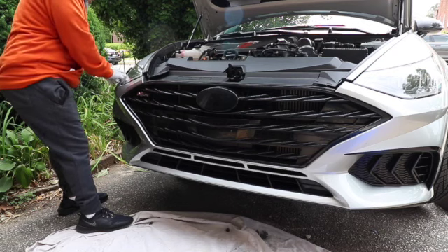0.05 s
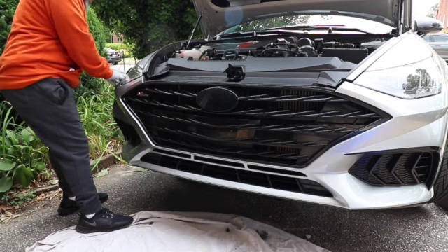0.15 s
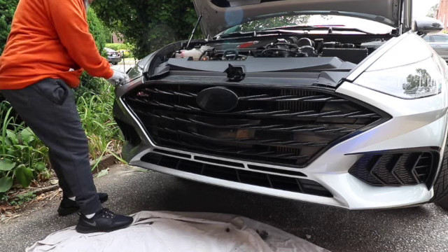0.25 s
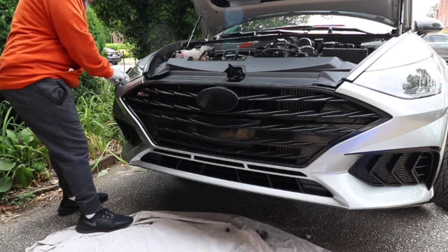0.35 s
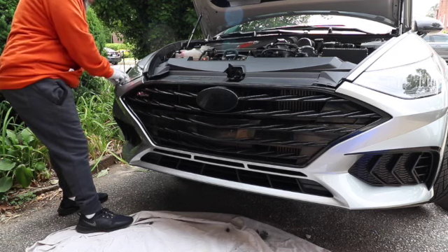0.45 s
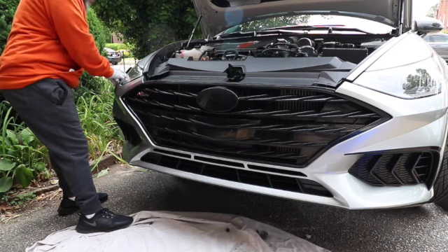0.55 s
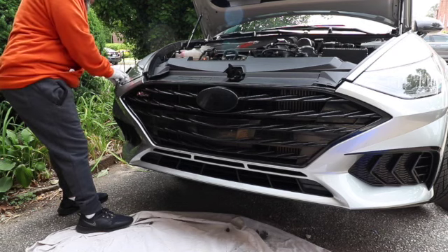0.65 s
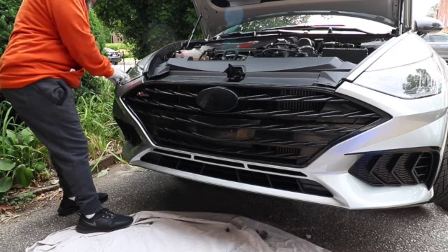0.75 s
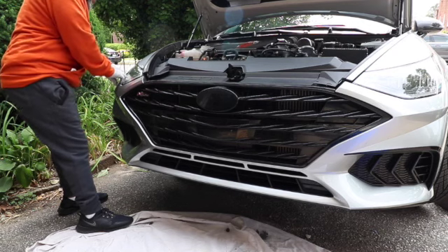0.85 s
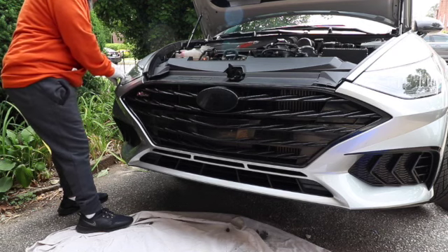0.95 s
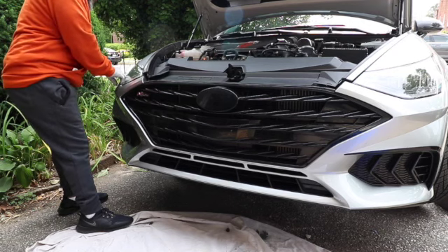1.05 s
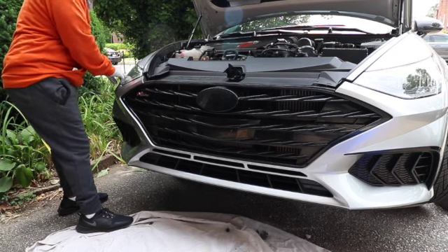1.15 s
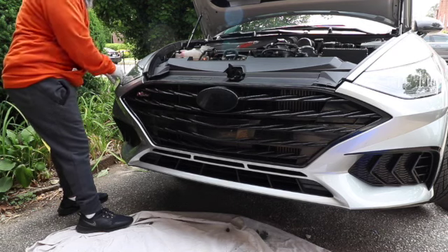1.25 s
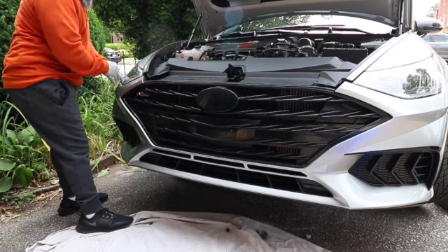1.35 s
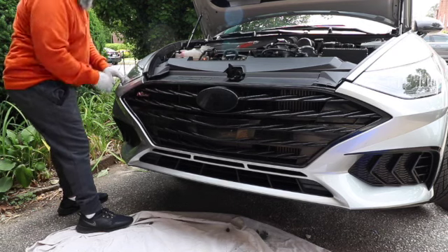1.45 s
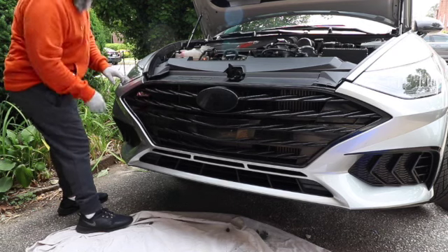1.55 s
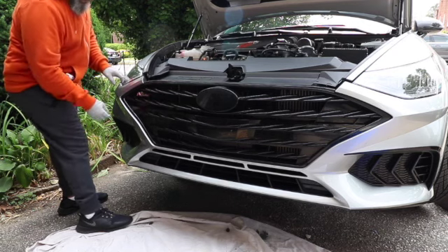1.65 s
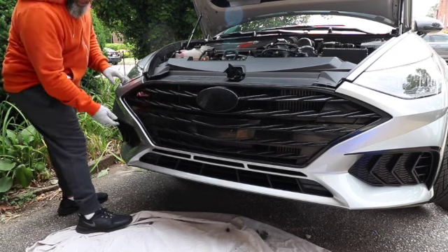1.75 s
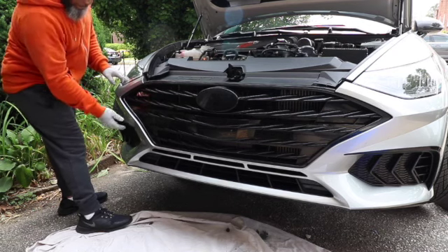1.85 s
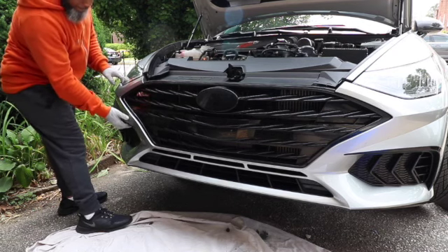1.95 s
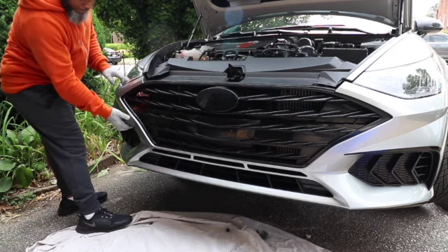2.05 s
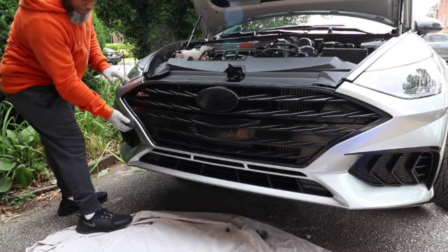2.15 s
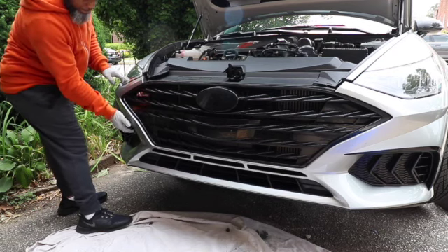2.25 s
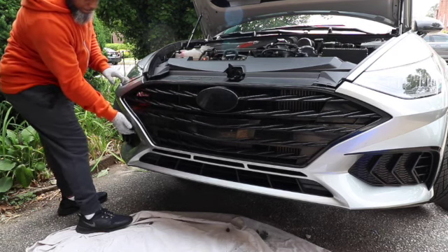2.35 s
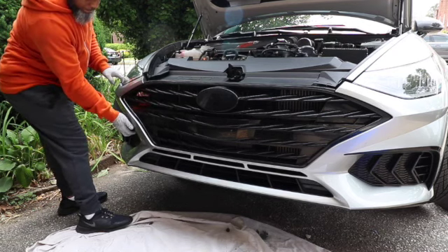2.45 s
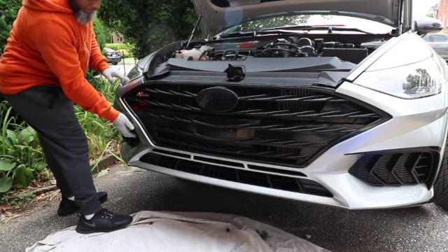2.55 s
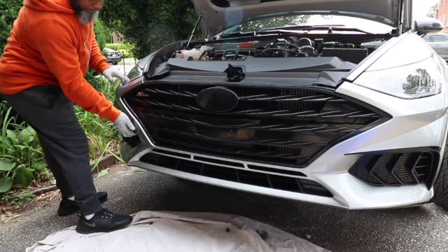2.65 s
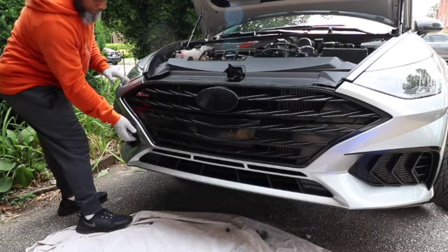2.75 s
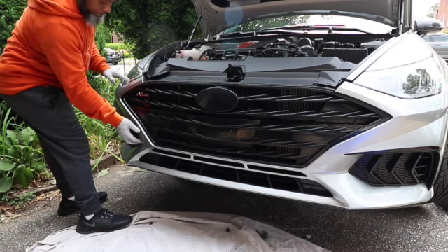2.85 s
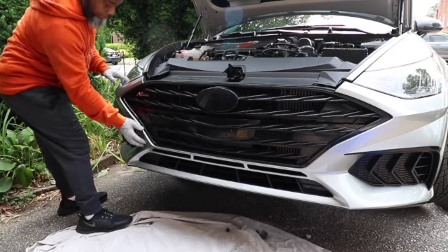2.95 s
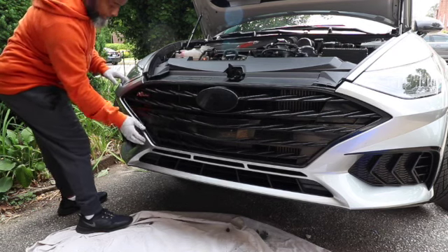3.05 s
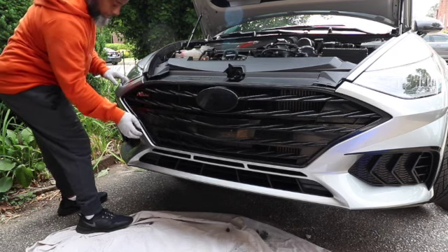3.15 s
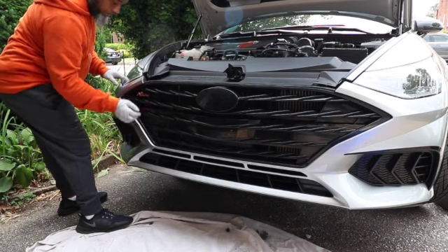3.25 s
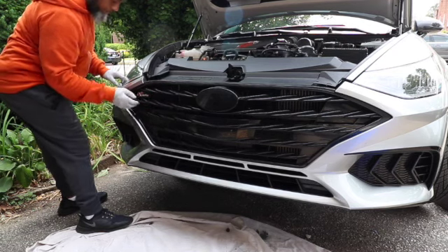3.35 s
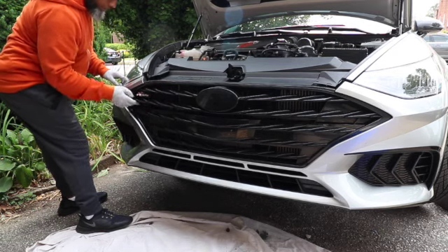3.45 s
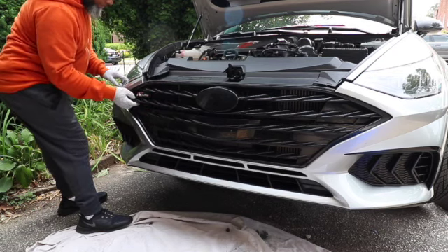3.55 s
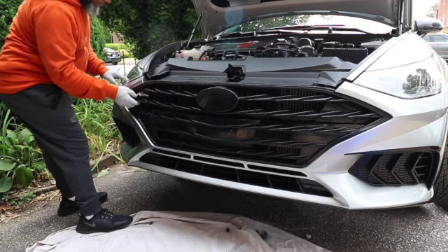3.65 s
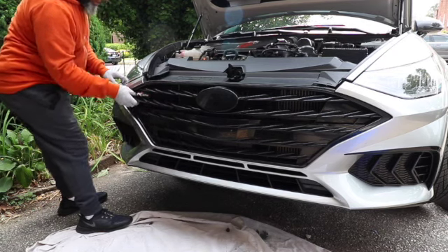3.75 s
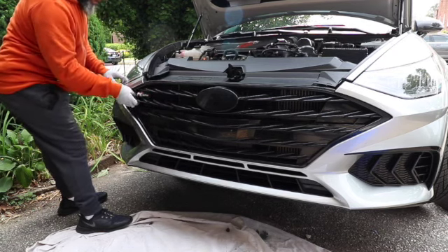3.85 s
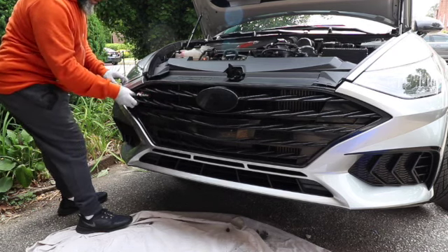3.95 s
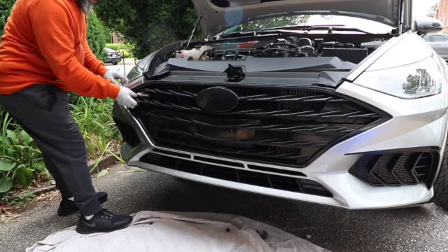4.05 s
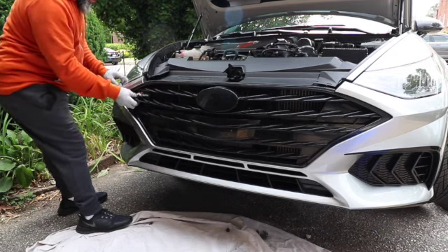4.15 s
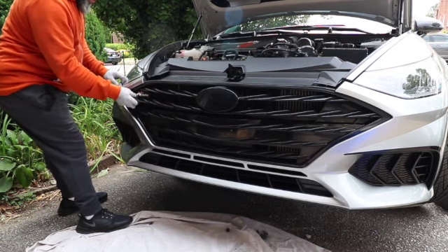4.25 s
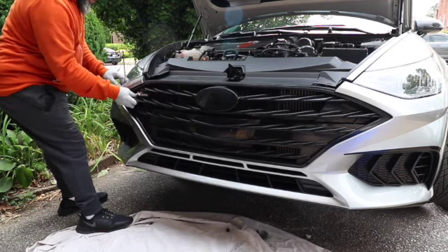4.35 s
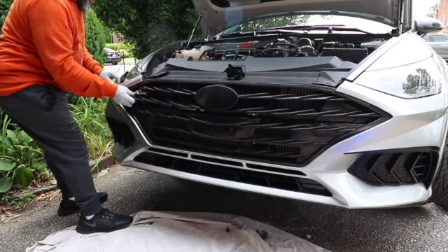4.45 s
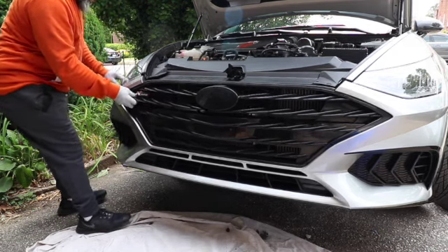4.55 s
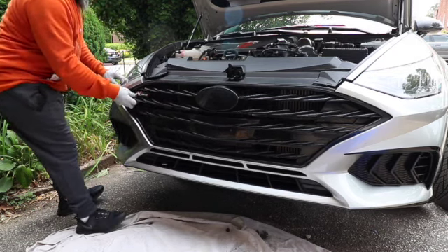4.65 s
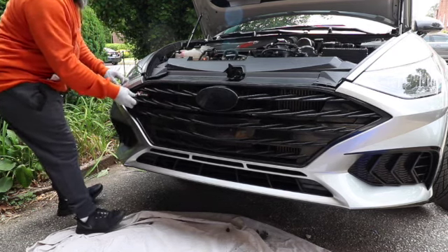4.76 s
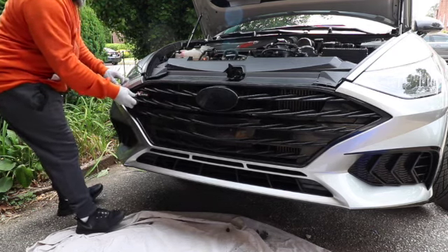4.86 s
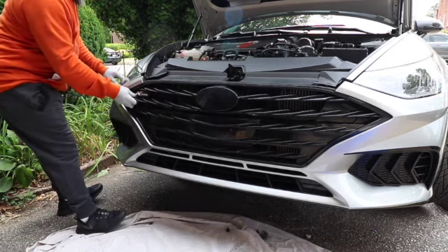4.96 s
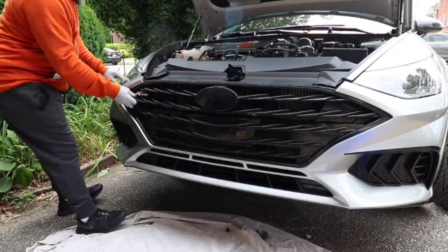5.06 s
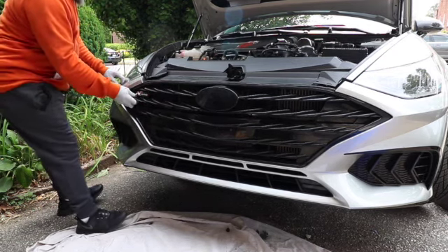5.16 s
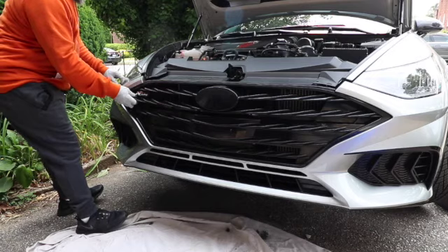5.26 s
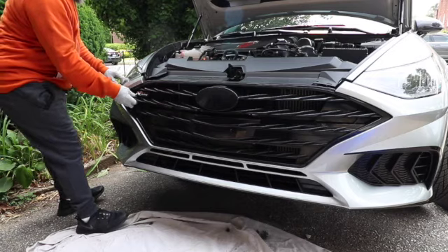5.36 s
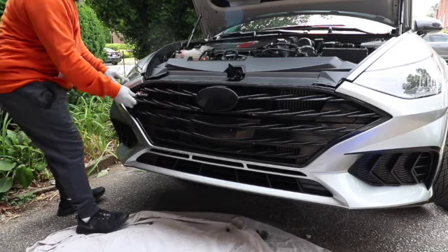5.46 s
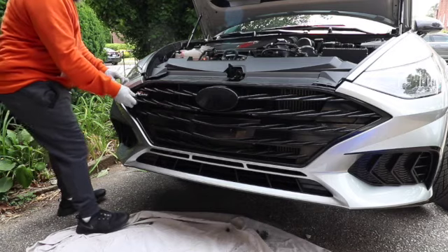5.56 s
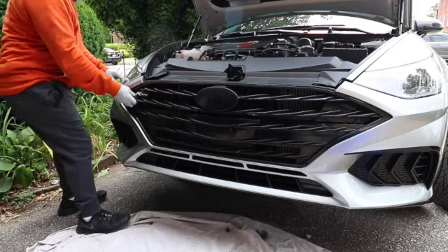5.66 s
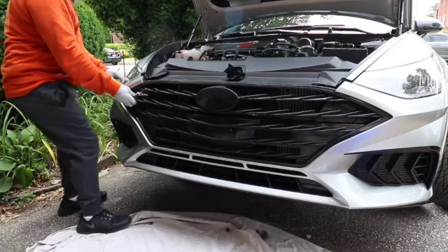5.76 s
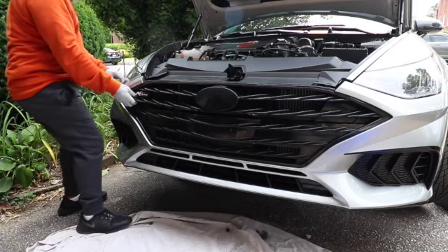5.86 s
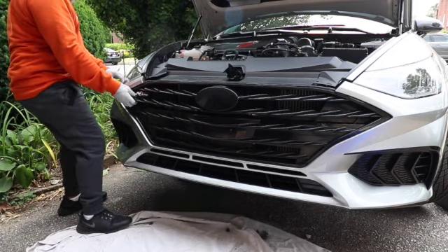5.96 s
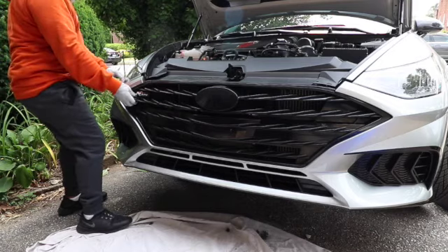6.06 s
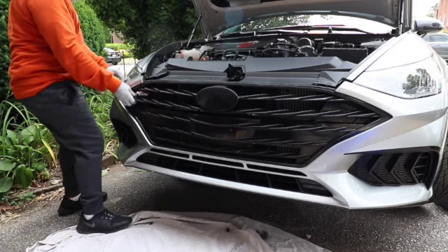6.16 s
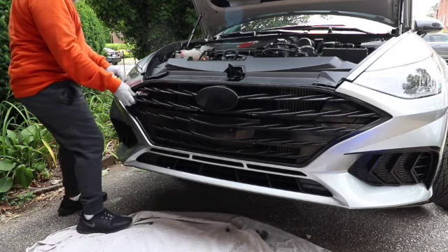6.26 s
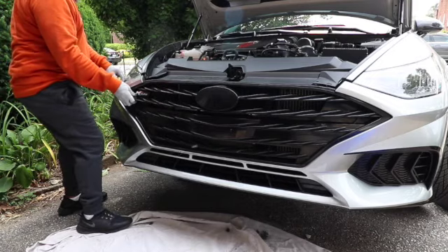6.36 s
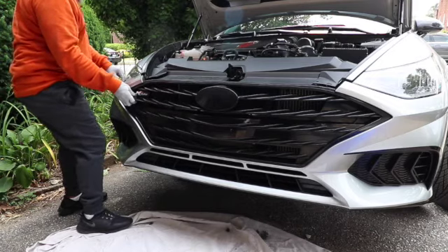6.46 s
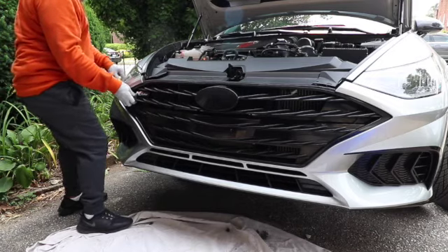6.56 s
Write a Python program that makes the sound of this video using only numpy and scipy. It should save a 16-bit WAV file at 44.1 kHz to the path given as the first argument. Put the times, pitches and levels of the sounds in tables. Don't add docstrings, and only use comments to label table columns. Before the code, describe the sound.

Quiet outdoor birdsong and distant traffic; gloved rubs and faint knocks on hollow plastic, then a short squeak and a loud cracking snap with rattling rebounds.

```python
import sys
import numpy as np
from scipy import signal
from scipy.fft import rfft, irfft, next_fast_len
from scipy.io import wavfile
from scipy.ndimage import uniform_filter1d

SR = 44100
rng = np.random.default_rng(int(sys.argv[2]) if len(sys.argv) > 2 else 0)


def pcm_store(signal):
    levels = np.round(np.clip(np.atleast_2d(signal), -1, 1) * 32767)
    wavfile.write(sys.argv[1], SR, levels.astype(np.int16).T)


def volts_from_decibels(level):
    exponent = np.asarray(level, float) / 20
    return 10 ** exponent


N = 291983
T = np.arange(N) / SR


def colour(table, hz):
    return np.interp(np.log(hz + 1), np.log([r[0] for r in table]), [r[1] for r in table])


def unit(x):
    return x / np.sqrt(np.mean(x ** 2))


def loudest(x):
    return x / np.sqrt(uniform_filter1d(x ** 2, 150).max())


def shaped(x, gain):
    size = next_fast_len(len(x), real=True)
    return irfft(rfft(x, size) * gain(np.fft.rfftfreq(size, 1 / SR)), size)[:len(x)]


def peak(hz, centre_hz, width_hz):
    return 1 / np.sqrt(1 + (2 * (hz - centre_hz) / width_hz) ** 2)


def walk(rate):
    k = int(SR / rate)
    steps = np.repeat(rng.standard_normal(N // k + 1), k)
    return 0.45 * uniform_filter1d(uniform_filter1d(steps, k), k)[:N]


def add(out, s, x):
    i = int(s * SR)
    out[i:i + len(x)] += x[:N - i]


def ring(hz, db, t60, t):
    decay = np.exp(-np.log(1000) * t / t60[:, None])
    return (volts_from_decibels(db)[:, None] * np.sin(2 * np.pi * hz[:, None] * t) * decay).sum(0)


def town():
    # f/Hz, level/dB per Hz
    roar_colour = [(24, -33.5), (40, -1), (199, -3.5), (312, -7.5), (382, -8.5), (646, -10), (990, -2.5),
                   (1240, -11.5), (2500, -18), (2980, -18.5), (4340, -24), (5870, -30), (6820, -32.5),
                   (14500, -35), (16000, -48.5)]
    # f/Hz, bandwidth/Hz, level/dB
    insects = [(5400, 90, -94.5), (5870, 50, -90), (5600, 80, -91), (5860, 800, -85.5), (6828, 69, -103)]
    # t/s of the closest point, swell/dB, half length/s
    passes = [(0, 1.5, .3), (1.0, 2, .35), (2.2, 1.5, .5), (3.2, 3.5, .15), (3.9, 2, .7), (4.85, 2.5, .15),
              (5.95, 4, .4)]
    swell = sum(db * np.exp(-((T - s) / half) ** 2) for s, db, half in passes)
    roar = 0
    for c in 40 * 2 ** np.arange(0, 9, .5):
        band = shaped(rng.standard_normal(N),
                      lambda f: np.exp(-(np.log2((f + 1) / c) / .4) ** 2) * volts_from_decibels(colour(roar_colour, f)))
        roar = roar + band * volts_from_decibels(0.4 * walk(6.4) + (swell - swell.mean()) * peak(c, 1000, 1300))
    out = unit(roar) * volts_from_decibels(-68.5)
    for hz, bandwidth, db in insects:
        line = unit(shaped(rng.standard_normal(N), lambda f: peak(f, hz, bandwidth) ** 2))
        out = out + line * volts_from_decibels(db + 2.0 * walk(2.3))
    return out


def hum():
    # t/s, length/s, start f/Hz, end f/Hz, level/dB
    motors = [
        (1.4, .62, 392, 375, -83),
        (2.08, 1.24, 160, 158, -73.5),
    ]
    out = np.zeros(N)
    waver = volts_from_decibels(1.5 * walk(7) + 1.3 * walk(25))
    for s, length, start_hz, end_hz, db in motors:
        n = int(length * SR)
        phase = 2 * np.pi * np.cumsum(np.linspace(start_hz, end_hz, n)) / SR
        tone = np.sin(phase) + volts_from_decibels(-11) * np.sin(2 * phase)
        add(out, s, volts_from_decibels(db) * signal.windows.tukey(n, .2) * tone)
    return np.sqrt(2) * out * waver


def wind():
    # t/s of the peak, peak level/dB, length/s down to -20 dB
    gusts = [(.75, -70, .1), (1.4, -76, .3), (2.03, -78, .08), (2.49, -80, .08), (2.73, -80, .06),
             (3.115, -54, .05), (3.17, -45, .1), (3.225, -47.5, .07), (3.34, -52.5, .05), (3.41, -57, .06),
             (3.6, -61, .12), (3.74, -51, .09), (3.85, -60, .08), (3.94, -50, .12), (4.08, -63, .08),
             (4.28, -54, .12), (4.5, -59, .2), (5.02, -61, .08), (5.11, -67, .1), (5.81, -77, .1),
             (6.25, -78, .1), (6.42, -73, .15), (6.62, -59.5, .3)]
    rise_share, calm_db = .6, -88
    rumble = shaped(rng.standard_normal(N), lambda f: peak(f, 28, 50) ** 2 * f / (f + 15))
    rumble = rumble / np.sqrt(uniform_filter1d(rumble ** 2, 3000))
    gain = volts_from_decibels(calm_db)
    for s, db, length in gusts:
        away = np.where(T < s, (s - T) / rise_share, T - s) / length
        gain = gain + volts_from_decibels(db - 20 * away ** 1.5)
    return rumble * gain * volts_from_decibels(-4.0)


def note(length, start_hz, end_hz):
    n = int(length * SR)
    hoarse = 70 * unit(uniform_filter1d(rng.standard_normal(SR // 10), 90))[:n]
    phase = 2 * np.pi * np.cumsum(np.linspace(start_hz, end_hz, n) + hoarse) / SR
    return np.sin(phase) * signal.windows.tukey(n, .7)


def trill(length, low_hz, high_hz):
    n = int(length * SR)
    chance = uniform_filter1d(rng.standard_normal((2, SR // 3)), 500)[:, :n] * 22
    flick = np.cumsum(48 * (1 + .35 * chance[0])) / SR % 1
    hz = low_hz + (high_hz - low_hz) * (.06 + .85 * flick ** 2.5 + .1 * chance[1])
    loudness = np.sin(np.pi * flick) * volts_from_decibels(1.6 * chance[1]) * signal.windows.tukey(n, .3)
    warble = np.sin(2 * np.pi * np.cumsum(hz) / SR) * loudness
    add(warble, 0, volts_from_decibels(-3.0) * note(.022, high_hz, .96 * high_hz))
    return warble


def birds():
    # delay/s, length/s, start f/Hz, end f/Hz, level/dB
    falling = [(0, 0.0324, 4350, 3700, -5), (.04, 0.03, 3580, 3260, -1), (.072, 0.03, 2860, 2980, 1),
               (.1, .03, 2900, 2600, -7)]
    # t/s, level/dB
    falling_sung = [(0.349, -74.5), (1.233, -71.5), (2.361, -76.5), (3.234, -76), (4.964, -80), (5.61, -79),
                    (6.504, -79)]
    # delay/s, length/s, start f/Hz, end f/Hz, level/dB
    whistle = [
        (0, .05, 4880, 4834, -1.5),
        (.07, .025, 3620, 4400, -1),
        (.1, .03, 3900, 3700, -8.5),
    ]
    # t/s, level/dB
    whistle_sung = [(2.019, -73.5), (3.005, -75), (4.2, -80), (6.02, -75)]
    # t/s, length/s, low f/Hz, high f/Hz, level/dB
    trills = [(0, .04, 3500, 4330, -74), (.98, .26, 3350, 5000, -71), (2.53, .22, 3400, 5030, -71),
              (3.745, .21, 3400, 5370, -69.5), (5.155, .11, 3300, 5400, -72), (5.495, .24, 3300, 5340, -68),
              (6.265, .22, 3500, 5170, -70), (6.575, .045, 4900, 5920, -71)]
    out = np.zeros(N)
    for phrase, times in ((falling, falling_sung), (whistle, whistle_sung)):
        for s, db in times:
            for delay, length, start_hz, end_hz, note_db in phrase:
                add(out, s + delay, volts_from_decibels(db + note_db - 0.8) * note(length, start_hz, end_hz))
    for s, length, low_hz, high_hz, db in trills:
        add(out, s, volts_from_decibels(db - 6.0) * trill(max(length, .03), low_hz, high_hz))
    t = np.arange(SR // 4) / SR
    echo = volts_from_decibels(-23) * rng.standard_normal(len(t)) * np.exp(-np.log(1000) * t / .2)
    echo[0] = 1
    return signal.fftconvolve(out, echo)[:N]


def fingers():
    # t/s, peak level/dB, pitch factor
    touches = [
        (1.074, -58.5, 1.0),
        (2.012, -44, 0.98),
        (2.041, -52.5, 0.82),
        (2.54, -54, 0.84),
        (5.062, -56, 0.96),
    ]
    # f/Hz, level/dB, t60/s
    knock_modes = [(154, 0, 0.095), (311, 0.5, 0.083), (503, 7, 0.032), (615, 4.5, 0.03), (1150, -4, .03)]
    # f/Hz, level/dB, t60/s
    tab_modes = [(735, -11, 0.069), (965, 1, 0.08), (2980, -1.5, .025), (5800, -6, .012)]
    out, t = np.zeros(N), np.arange(6000) / SR
    hz, db, t60 = np.transpose(knock_modes)
    for s, peak_db, pitch in touches:
        uneven_db = db + 2.0 * rng.standard_normal(len(hz))
        soft_start = 1 - np.exp(-t / 0.0015)
        add(out, s, volts_from_decibels(peak_db - 6.0) * ring(hz * pitch, uneven_db, t60, t) * soft_start)
    add(out, 3.693, volts_from_decibels(-48) * ring(*np.transpose(tab_modes), t))
    return out


def rubs():
    # t/s, length/s, level/dB, top brightness/dB, resonance level/dB
    strokes = [(.11, .035, -75, -11, -13), (.4, 0.043, -76.5, -6, -4), (.5, 0.036, -75.5, -6, -0.5),
               (0.71, 0.069, -69.5, -13, 6), (.785, 0.061, -73.5, -12, -5), (.89, 0.089, -83, -2, 2),
               (1.345, 0.024, -74.5, -9, -15), (2.22, .07, -80, -4, -28), (2.94, 0.12, -77.5, -2, -25),
               (3.39, 0.14, -79, 2, 1), (3.8, 0.13, -77, -7, -13), (4.085, 0.066, -70, -3.5, -34),
               (4.3, .06, -70, -11, 0)]
    # f/Hz, bandwidth/Hz, level/dB
    edge_peaks = [(1850, 130, 6), (2060, 51, 9), (3530, 150, 5), (3800, 120, -4), (5200, 400, -29),
                  (5600, 300, -13)]
    out = np.zeros(N)
    for s, length, db, top_db, edge_db in strokes:
        chance = rng.standard_normal((2, SR // 8))[:, :int(length * SR)]
        patches = volts_from_decibels(3.7 * uniform_filter1d(chance[1], 150) * 6.0)
        stroke = np.sin(np.pi * np.linspace(0, 1, chance.shape[1]) ** 0.57) ** 0.48
        slips = chance[0] * patches * stroke
        tint = [(700, -6.5), (2000, 5), (6000, 5), (8500, top_db), (13000, top_db), (16000, top_db - 8.0)]
        hiss = shaped(slips, lambda f: volts_from_decibels(colour(tint, f)))
        edge = shaped(slips, lambda f: sum(volts_from_decibels(d) * peak(f, c, w) for c, w, d in edge_peaks))
        add(out, s, volts_from_decibels(db) * (unit(hiss) + volts_from_decibels(edge_db) * unit(edge)))
    return out


def squeak():
    creep = [(4.249, 1037, -78), (4.265, 1180, -64), (4.278, 1420, -68), (4.296, 1230, -52),
             (4.312, 980, -52), (4.326, 810, -49), (4.345, 690, -57), (4.36, 650, -65), (4.384, 615, -76)]
    s, hz, db = np.transpose(creep)
    t = np.arange(s[0], s[-1], 1 / SR)
    chance = rng.standard_normal((2, SR // 4))[:, :len(t)]
    rough = np.interp(t, (4.32, 4.35), (.035, .3))
    jitter = 1 + rough * unit(uniform_filter1d(chance[0], 50))
    phase = np.cumsum(np.interp(t, s, hz) * jitter) / SR
    train = sum(np.cos(2 * np.pi * k * phase) for k in range(1, 14))
    train = train * (1 + 5.0 * rough * chance[1])
    edge = [(400, -3), (800, 8), (1500, -6), (2500, 4.5),
            (4500, -9), (7500, -27), (11500, -19.5), (15000, -23.5)]
    out = np.zeros(N)
    add(out, s[0], unit(shaped(train, lambda f: volts_from_decibels(colour(edge, f)))) * volts_from_decibels(np.interp(t, s, db)))
    return out


def dense_modes(field, bands, tilt, rattle, share, t):
    # f/Hz, level/dB per Hz
    shell_colour = [(53, -67.5), (90, -3), (160, -8), (205, 2), (393, -2.5), (532, -8), (876, -6),
                    (1140, -13.5), (1680, -9), (2180, -15.5), (5650, -15), (7170, -28), (12900, -30),
                    (16000, -31)]
    # f/Hz, t60/s
    shell_t60 = [(100, 0.44), (500, 0.34), (2000, 0.32), (6000, .22), (15000, 0.21)]
    start, knocks = rng.integers(2 * len(t)), rng.standard_normal(len(t) // 40)
    fed = rattle * np.minimum(1, (1500 / bands[:, None]) ** 0.9)
    uneven = volts_from_decibels(2.2 * uniform_filter1d(np.repeat(knocks, 40), 30) * np.exp(-t / 0.017))
    fall = np.log(1000) * np.maximum(t - fed, 0) / (share * colour(shell_t60, bands)[:, None])
    rise = 1 - np.exp(-t * bands[:, None] / 1.6)
    shape = rise * (np.exp(-fall / .17) + volts_from_decibels(-10.5) * np.exp(-fall))
    modes = field[:, start:start + len(t)] * shape * uneven
    energy = np.sqrt((shape ** 2).sum(1) * bands / (modes ** 2).sum(1))
    return (energy * volts_from_decibels(colour(shell_colour, bands) + colour(tilt, bands))) @ modes


def panel():
    # f/Hz, level/dB, t60/s
    strong_modes = [(576, -9, 0.047), (733, -8, 0.059), (858.2, -17, 0.3), (1420, -14, 0.23),
                    (1680, -14, 0.15), (1790, -22, 0.2), (2000, -19, 0.18)]
    # t/s, body level/dB, crack over body/dB, thud over body/dB
    ticks = [(0.645, -56, 10, 7), (0.941, -55, -6.5, 2), (3.694, -43.5, -11, -27), (4.357, -53, -2, -12),
             (4.833, -57, -4, 8.5), (5.347, -64, -6, -7), (6.241, -58, -7, 1)]
    # t/s, body level/dB, crack over body/dB, thud over body/dB
    snaps = [(4.41, -28.5, 7, -6), (4.42, -9, -6.5, -23), (4.443, -29.5, -8, -1), (4.502, -42, 12, -11),
             (4.5885, -21, -19, -12), (4.597, -26, -13, -9), (4.607, -27, -13, -15),
             (4.637, -39.5, -14, -6), (4.677, -32, -17, -24), (4.682, -26.5, -9.5, -8.5),
             (4.691, -33.5, -6.5, -8.5), (4.714, -37.5, -8, 0)]
    out, t = np.zeros(N), np.arange(12000) / SR
    hz, db, t60 = np.transpose(strong_modes)
    bands = 90 * 2 ** np.arange(0, 7.6, 1 / 3)
    noise = rng.standard_normal(3 * len(t))
    field = np.array([shaped(noise, lambda f: np.exp(-(np.log2((f + 1) / c) / .25) ** 2)) for c in bands])
    blows = [row + (.003, .38) for row in ticks] + [row + (.0068, .95) for row in snaps]
    for s, body_db, crack_db, thud_db, rattle, share in blows:
        tilt = [(250, thud_db + 4.5), (550, 0.00043), (1200, .2 * crack_db), (2100, crack_db + 1.5),
                (3200, crack_db + 4.0), (6000, crack_db + 6.0),
                (12000, crack_db + 7.0 + .6 * (body_db + 11))]
        where = 2.0 * rng.standard_normal(len(hz))
        strong = ring(hz, db + colour(tilt, hz) + where, .5 * t60 * share, t)
        strong = strong * (1 - np.exp(-t / .002))
        dense = dense_modes(field, bands, tilt, rattle, share, t)
        add(out, s, volts_from_decibels(body_db - 7.5) * (volts_from_decibels(-7.0) * loudest(strong) + loudest(dense)))
    return out


def scene():
    return (town() + hum() + wind() + birds() + fingers() + rubs() + squeak() + panel())[None]


def band_limit(x):
    return signal.sosfilt(signal.butter(12, 16810, fs=SR, output="sos"), x)


def record(dry):
    top = signal.ellip(8, .2, 70, 15900, fs=SR, output="sos")
    mix = signal.sosfilt(top, dry)
    return band_limit(mix)


dry = scene()
out = record(dry)
pcm_store(out)
```